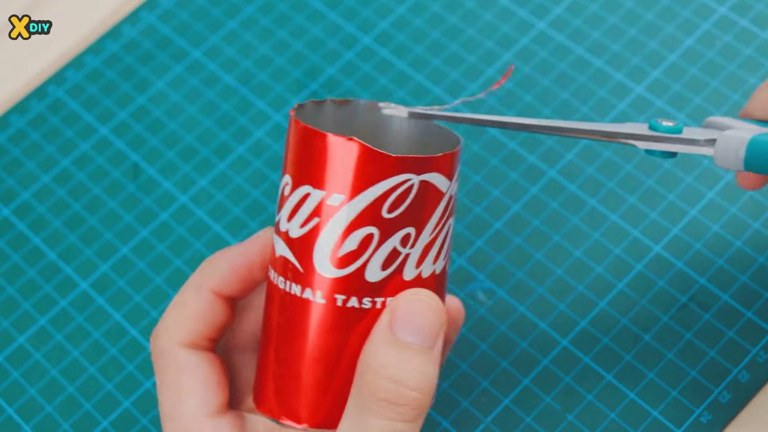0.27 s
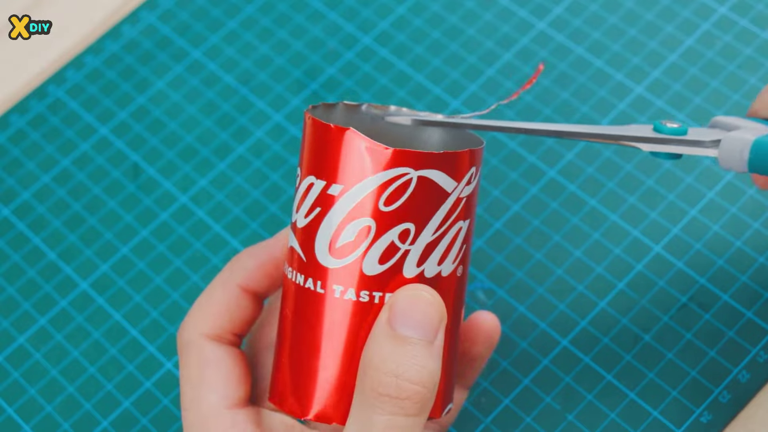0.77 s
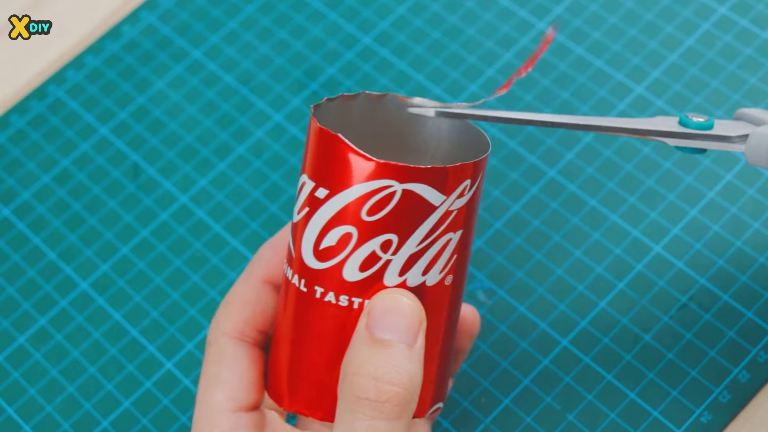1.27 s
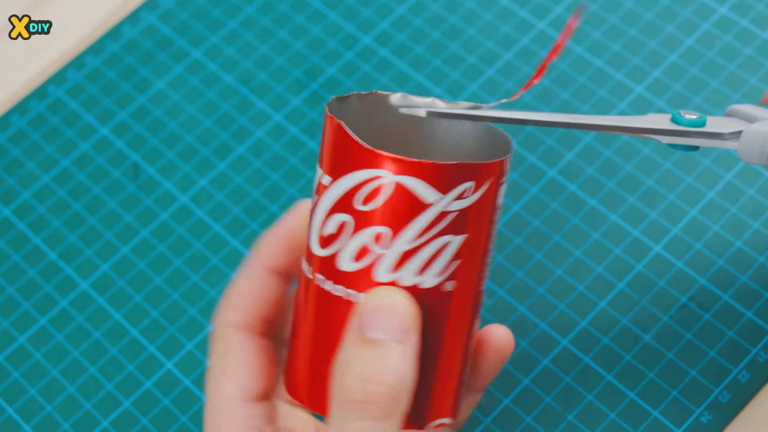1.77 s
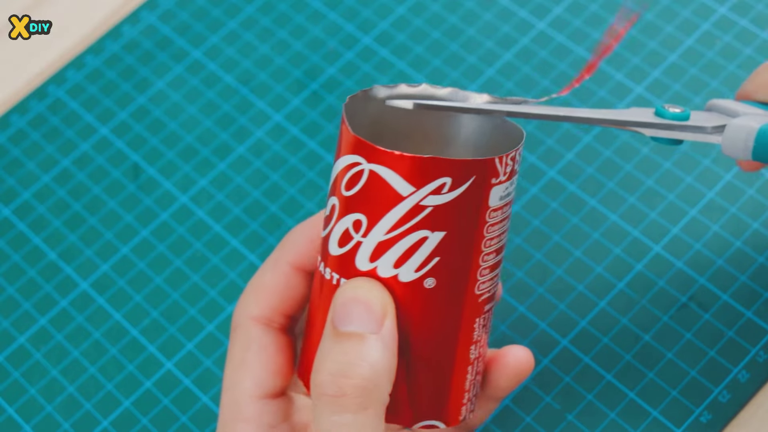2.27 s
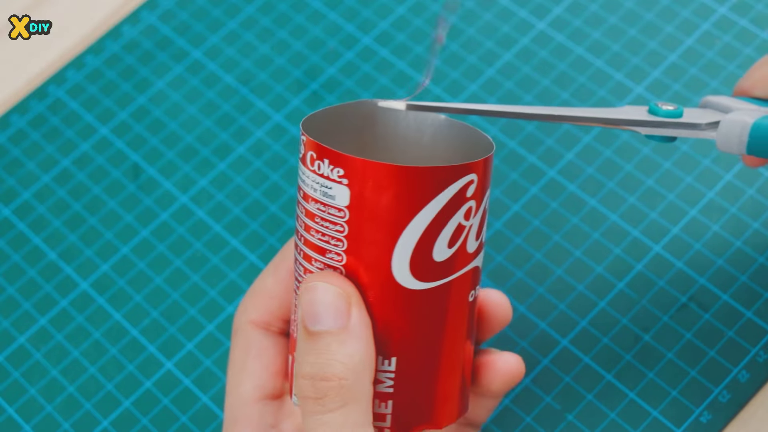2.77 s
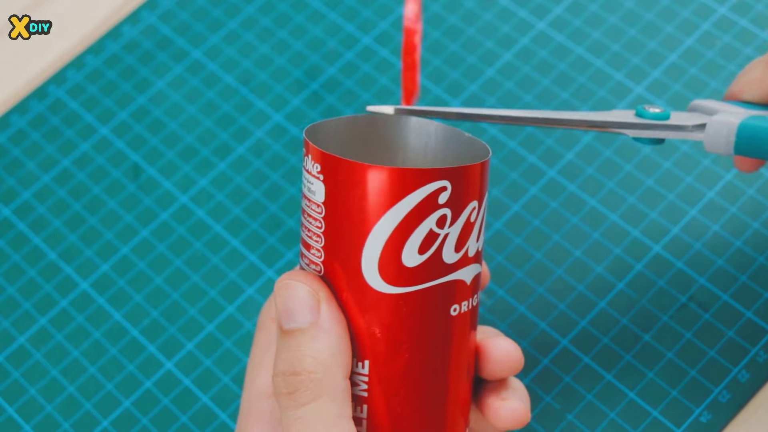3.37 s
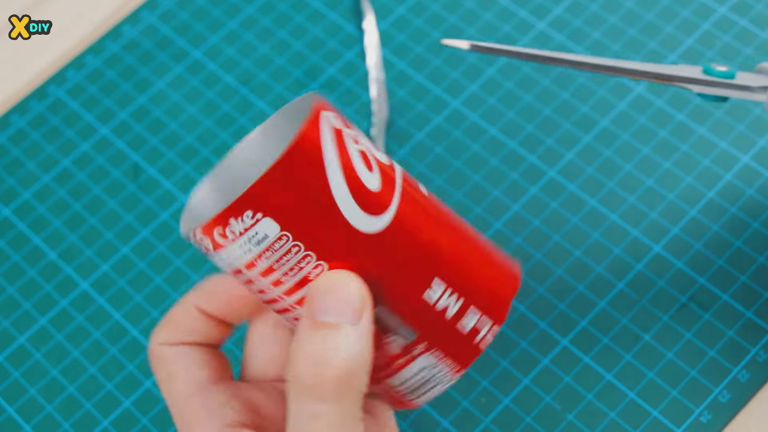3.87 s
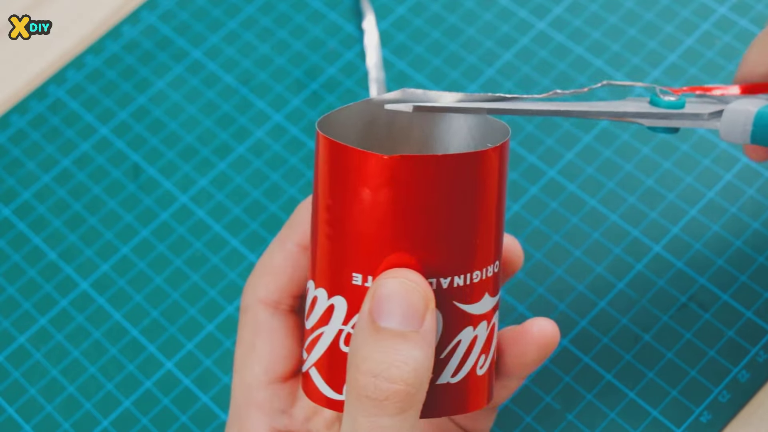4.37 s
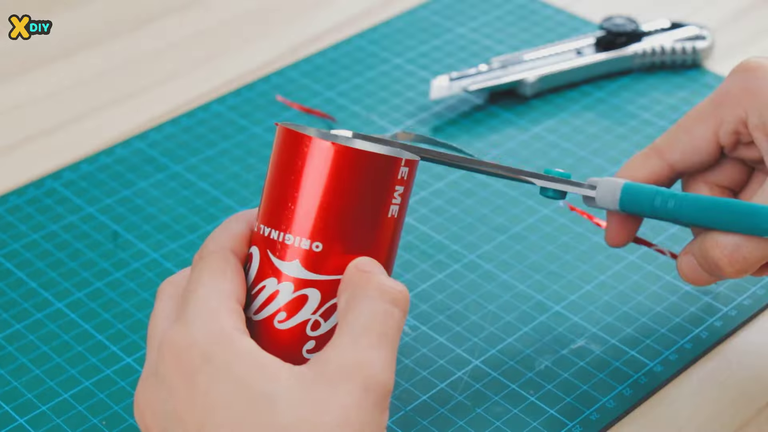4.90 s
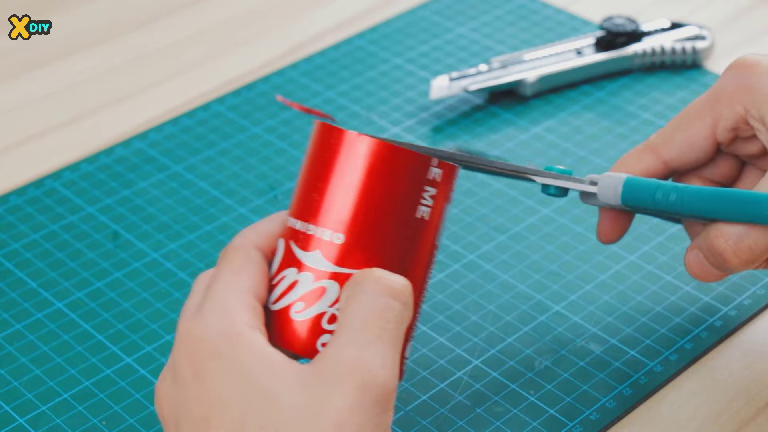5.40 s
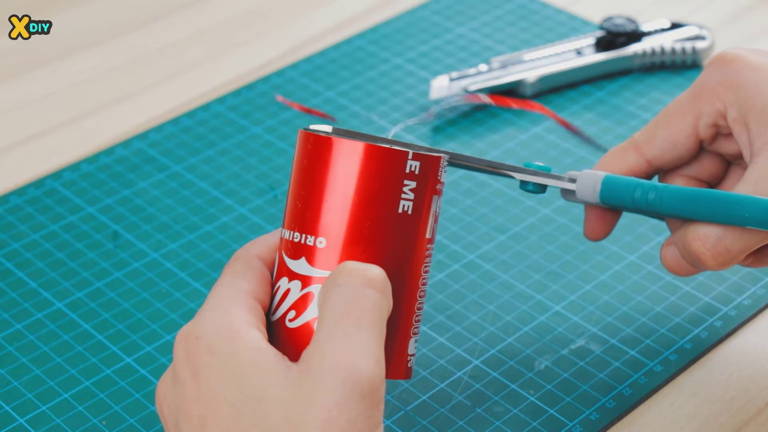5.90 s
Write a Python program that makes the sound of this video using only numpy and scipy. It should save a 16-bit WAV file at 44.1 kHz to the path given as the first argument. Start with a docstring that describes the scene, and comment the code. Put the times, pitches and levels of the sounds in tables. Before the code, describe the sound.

Thin sheet metal is cut with steel scissors, heard close and slightly to the right. Bright, dry cracks come unevenly, the strongest early on, making the hollow can buckle and ring briefly. Later there are small strip rustles, hissing blades, closely spaced snips and clicks, a last snap, a little squeal and faint scrapes. Short bright room reflections and low steady room noise surround it all.

```python
"""Scissors trim the rim of an empty, hand-held aluminium can in a small, live room, over faint noise, whine and hiss.
A faint rasp and light snaps lead to the hardest snap at 1.4 s: the can wall pops, rattles and rings, steel clicks.
Lighter snaps follow, rustles of the loose strip from 2.6 s, sliding blades at 3.5 s, then close cuts from 4 to 4.8 s.
A last snap at 5.3 s leads to a squeal and a few faint, uneven rasps.
Noise bursts and single blows drive resonances of blades, wall and can; stick-slip noise makes the rasps."""
import sys
import numpy as np
from scipy import signal
from scipy.fft import rfft, irfft
from scipy.io import wavfile
from scipy.ndimage import uniform_filter1d

SR = 44100
rng = np.random.default_rng(int(sys.argv[2]) if len(sys.argv) > 2 else 0)


def dump_mix(stems):
    """Bounce the given channels to the path in sys.argv[1] as a 16-bit WAV at rate SR."""
    frames = np.atleast_2d(stems).T  # one column per channel
    limited = np.clip(frames, -1, 1)  # hard clip at full scale
    pcm = np.round(limited * 32767).astype(np.int16)
    wavfile.write(sys.argv[1], SR, pcm)


N = 271038

# The sheet cracks through under the blades. Each row: start in seconds, decay in seconds, crack level in dB,
# pitch of the cut edge in Hz, wall level in dB, pitch of the bent panel in Hz.
SNAP_ROWS = [(0.3494, 0.0014, -22, 10600, -48, 1620), (0.7076, 0.00063, -35.5, 9400, -49, 1470),
             (0.7358, 0.00056, -56, 4330, -57, 3250), (1.4228, 0.0032, -15, 8870, -28, 1330),
             (1.4694, 0.0031, -21, 7700, -28, 2430), (2.136, 0.00082, -22, 9500, -35.5, 1970),
             (2.4066, 0.0056, -44, 6130, -49, 2180), (2.431, 0.0054, -48, 5670, -46.5, 2560),
             (3.071, 0.0019, -34, 5930, -44.5, 1570), (3.365, 0.0034, -31, 6900, -35, 1410),
             (3.9853, 0.0019, -36, 5700, -47, 1550), (4.028, 0.0018, -43, 6200, -48.5, 1490),
             (4.1294, 0.0029, -33, 5770, -39, 2860), (4.4484, 0.0045, -28, 6900, -36.5, 1440),
             (4.7648, 0.0027, -40, 7000, -38, 1370), (4.784, 0.0015, -29, 7100, -42, 1300),
             (5.3299, 0.012, -36.5, 6900, -41, 1336)]
# Left-right likeness of diffuse sound. Each row: frequency in Hz, likeness (1 = identical sides).
SIDE_LIKENESS = [(60, .85), (130, 1), (290, 0.9), (640, 0.76), (1400, 0.21), (3100, 0.33), (6800, .1),
                 (15000, 0.091)]

SIDES = np.array([[-1], [1]])   # left, right
WALL_RIGHT_DB = 0.34   # the open mouth of the can faces right: added right, taken off left
SNAP_THUD_DB = -17.5   # flexing of the can against the wall's level
FIVE_MS_GAIN = np.sqrt(0.005 * SR)   # unit energy becomes unit rms over 5 ms


def from_db(db):
    """Amplitude factor of a level in dB."""
    return 10 ** (np.asarray(db) / 20)


def unit_energy(x):
    """Scales each channel so that its squares sum to one."""
    return x / np.sqrt(np.sum(x ** 2, axis=-1, keepdims=True) + 1e-20)


def at_hz(points, hz):
    """Reads a curve of (Hz, value) on a logarithmic frequency axis."""
    point_hz, values = np.array(points).T
    return np.interp(np.log(hz), np.log(point_hz), values)


def pair(white, alike):
    """Two unrelated noises become a left and a right of the given likeness."""
    common = np.sqrt(1 + alike) * white[0]
    opposed = np.sqrt(1 - alike) * white[1] * -SIDES
    return (common + opposed) / np.sqrt(2)


def noise_pair(length, alike):
    """Stereo white noise of the given likeness."""
    return pair(rng.standard_normal((2, length)), alike)


def add(track, s, sound):
    """Mixes a sound into the track from s seconds on."""
    start = max(round(s * SR), 0)
    track[:, start:start + sound.shape[1]] += sound[:, :max(N - start, 0)]


def resonate(x, modes, tilt_db=0):
    """Parallel resonances (Hz, width Hz, dB) of alternating sign, tilted per octave; unit energy."""
    out = 0
    for k, (hz, width_hz, level_db) in enumerate(modes):
        r = np.exp(-np.pi * width_hz / SR)
        w = 2 * np.pi * hz / SR
        gain = from_db(level_db + tilt_db * np.log2(hz)) * (-1) ** k
        out = out + gain * signal.lfilter([1 - r * r, 0, r * r - 1], [1, -2 * r * np.cos(w), r * r], x)
    return unit_energy(out)


def high_pass(x, hz):
    """Second-order high-pass."""
    return signal.sosfilt(signal.butter(2, hz, "high", fs=SR, output="sos"), x)


def stress(x, hz, q, gain_db):
    """One more resonance in series raises or lowers the spectrum around hz; unit energy."""
    peak = signal.lfilter(*signal.iirpeak(hz, q, fs=SR), x)
    return unit_energy(x + (from_db(gain_db) - 1) * peak)


def flutter(x, depth_db, size=256):
    """As the contact point shifts, resonances come and go: patches of a few ms and some 500 Hz vary in level."""
    cells = signal.stft(x, nperseg=size)[2]
    patches = rng.standard_normal(cells.shape[1:])
    for axis in (0, 1):
        patches = uniform_filter1d(patches, size=3, axis=axis)
    gain = from_db(depth_db * np.clip(patches / patches.std(), -2, 2))
    return signal.istft(cells * gain / np.sqrt(np.mean(gain ** 2)))[1][:, :N]


def background(air_db=-63):
    """Steady room noise and hiss, shaped in frequency, with two faint, slightly wavering tones."""
    # Noise spectrum. Each row: frequency in Hz, relative density in dB.
    air_spectrum = [(25, -20), (70, -20), (110, -7), (220, -4.5), (450, -0.5), (800, -7.5), (1250, -7.5),
                    (2000, -12), (3200, -22), (4800, -31), (8000, -27.5), (11500, -29.5), (13500, -38.5),
                    (16000, -50)]
    # Steady tones. Each row: pitch in Hz, level in dB rms.
    whine_rows = [(225, -72.5), (1416, -75.5)]
    hz = np.maximum(np.arange(N // 2 + 1) * SR / N, 1)
    white = rfft(rng.standard_normal((2, N)))
    air = irfft(pair(white, at_hz(SIDE_LIKENESS, hz)) * from_db(at_hz(air_spectrum, hz)), N)
    tones = 0
    for pitch_hz, db in whine_rows:
        tones = tones + from_db(db) * resonate(noise_pair(N, 0.95), [(pitch_hz, 4.0, 0)])
    return np.sqrt(N) * (from_db(air_db) * unit_energy(air) + tones)


def room(x, onset_s=0.0023, early_db=-7.0, early_s=0.009):
    """Quick reflections from desk and hands, then a diffuse tail whose decay time varies with frequency."""
    # Decay of the tail. Each row: frequency in Hz, t60 in seconds.
    t60_rows = [(220, 1.1), (800, 0.27), (2100, 0.37), (5600, 0.55), (9100, 0.38), (15000, 0.27)]
    # Colour of the response. Each row: frequency in Hz, level in dB.
    level_rows = [(210, 3), (620, 3.5), (1400, 0.5), (3000, 0.2), (6000, -1.27), (10000, 0), (15000, -5.5)]
    t = np.arange(SR * 3 // 4) / SR
    hz = np.maximum(np.fft.rfftfreq(len(t), 1 / SR), 1)
    white = rfft(rng.standard_normal((2, len(t))))
    noise = pair(white, at_hz(SIDE_LIKENESS, hz)) * from_db(at_hz(level_rows, hz))
    early = from_db(early_db) * unit_energy(np.exp(-t / early_s))
    centres_hz, t60s = np.transpose(t60_rows)
    response = 0
    for share, t60_s in zip(np.eye(len(centres_hz)), t60s):
        # neighbouring bands cross-fade
        band = irfft(noise * np.interp(np.log(hz), np.log(centres_hz), share), len(t))
        tail = unit_energy(np.exp(-np.log(1000) * t / t60_s))
        response = response + band * np.hypot(tail, early)
    onset = 1 - np.exp(-(t / onset_s) ** 2)
    return signal.fftconvolve(x, response * onset, axes=1)[:, :N]


def thumps(hardest_db=-68.5, cutoff_hz=170, decay_s=0.022, follow=2.4):
    """Can and hand jolt as the sheet gives way: low-passed noise bursts, falling off faster than the snaps."""
    out, t = np.zeros((2, N)), np.arange(SR // 4) / SR
    hardest_snap_db = max(row[2] for row in SNAP_ROWS)
    dull = signal.butter(2, cutoff_hz, fs=SR, output="sos")
    for s, _, snap_db, *_ in SNAP_ROWS:
        jolt = signal.sosfilt(dull, noise_pair(len(t), 0.9) * np.exp(-t / decay_s))
        level = from_db(hardest_db + follow * (snap_db - hardest_snap_db))
        add(out, s, level * np.sqrt(len(t)) * unit_energy(jolt))
    return out


def friction(s, half_s, db, modes, alike=0.6, rough_db=3.0, rough_s=0.004):
    """Rough friction swells and fades in resonances, passed twice so the valleys between them stay dark."""
    out, t = np.zeros((2, N)), np.arange(SR // 4) / SR
    middle = t[-1] / 2
    knots = np.arange(0, t[-1], rough_s)
    roughness = np.interp(t, knots, rng.standard_normal(len(knots)))
    swell = np.exp(-((t - middle) / half_s) ** 2) * from_db(rough_db * roughness)
    level_modes = [(hz, width_hz, 0) for hz, width_hz, _ in modes]
    tone = resonate(resonate(noise_pair(len(t), alike), modes), level_modes)
    add(out, s - middle, from_db(db) * np.sqrt(half_s * SR) * unit_energy(swell * tone))
    return out


def rubbing(chirp_width_hz=200, chirp_q=5.2, flutter_db=3.5):
    """Friction drives resonances: chirps of sheet or can, rustles of the loose strip, blade hiss and squeal."""
    # The dragging blade makes one resonance of sheet or can sing.
    # Each row: loudest moment in seconds, half length in seconds, level in dB, pitch in Hz.
    chirp_rows = [(1.478, 0.0047, -29, 3180), (1.523, 0.0087, -34, 3150), (2.199, 0.0095, -36, 2700),
                  (2.191, .055, -55.5, 970), (2.21, 0.061, -55.5, 637), (2.235, 0.054, -51.5, 341),
                  (3.37, 0.0092, -38.5, 1410), (3.377, 0.023, -47.5, 2120), (4.128, 0.026, -51, 804),
                  (4.132, 0.0065, -41, 5800), (4.19, 0.031, -46, 2630), (4.247, 0.012, -48, 2560),
                  (4.405, .007, -50, 5900), (4.785, 0.0059, -40.5, 1110), (4.791, 0.02, -49.5, 816),
                  (4.785, .01, -53, 400)]
    # The loose strip brushes the blades. Each row: loudest moment in seconds, half length in seconds, level in dB.
    rustle_rows = [(0.895, 0.023, -81), (2.582, 0.025, -66), (2.61, 0.0063, -50.5), (2.629, 0.012, -54),
                   (2.782, 0.014, -64), (2.804, 0.01, -59.5), (2.851, 0.015, -69)]
    # The blades slide along each other. Each row: loudest moment in seconds, half length in seconds, level in dB.
    slide_rows = [(3.523, 0.025, -44.5), (3.624, 0.038, -53.5), (3.706, 0.023, -64.5), (3.892, .02, -75),
                  (5.963, 0.038, -69), (6.088, 0.0097, -55.5)]
    # One blade squeals against the rim: loudest moment in seconds, half length in seconds, level in dB.
    squeal_row = (5.498, 0.04, -44)
    # Resonances of strip, sliding steel and squeal. Each row: pitch in Hz, width in Hz, level in dB.
    strip_modes = [(2860, 770, -11.5), (5460, 660, -1), (6320, 900, -2), (8800, 3200, -12)]
    steel_modes = [(6900, 1200, 0), (8900, 1200, 3), (11000, 1900, 4), (14700, 1400, -3)]
    squeal_modes = [(3140, 630, -2.5), (3770, 560, -1), (5140, 1300, -7.5), (6500, 550, 1.5),
                    (7200, 700, -1), (11000, 4100, -9.5)]
    chirps = 0
    for s, half_s, db, hz in chirp_rows:
        width_hz = min(chirp_width_hz, hz / chirp_q)
        chirps = chirps + friction(s, half_s, db, [(hz, width_hz, 0)])
    rustles = sum(friction(*row, strip_modes) for row in rustle_rows)
    slides = sum(friction(*row, steel_modes) for row in slide_rows)
    squeal = friction(*squeal_row, squeal_modes, rough_db=0.8)
    return chirps + flutter(squeal + rustles + slides, flutter_db)


def grip(s):
    """The holding hand shifts: (freedom of the shell to ring in dB, flexing pitch in Hz) at a given moment."""
    # Each row: time in seconds, freedom to ring in dB, pitch of the can's flexing in Hz.
    grip_rows = [(0.35, 6, 467), (0.72, -3, 420), (1.45, 2.5, 410), (1.801, -5, 343), (2.15, -16.5, 344),
                 (3.1, 3.5, 403), (3.399, -16, 465), (4.1, -3, 815), (4.8, -16, 930), (5.35, 4.5, 600)]
    times, *columns = np.transpose(grip_rows)
    return [np.interp(s, times, column) for column in columns]


def metal(force, s, crack_db, edge_hz, tilt_db, wall_db, panel_hz, thud_db,
          edge_db=4.5, edge_q=7.0, panel_db=9.0, panel_q=10.0, flex_db=7.0, flex_q=5.0):
    """A force sounds the blades with the cut edge, the wall with the bent panel, and the whole can in the grip."""
    # Blades and rim, hand-damped wall, whole can flexing. Each row: pitch in Hz, width in Hz, level in dB.
    blade_modes = [(3150, 620, 1), (3980, 890, 0), (5660, 1100, 0), (7590, 1100, -0.5), (8520, 780, 1),
                   (11000, 2900, -2.5), (13750, 3600, -7.5)]
    wall_modes = [(1260, 140, -1.5), (1422, 130, 0.5), (1675, 460, -6), (2136, 240, -5.5), (2480, 360, -7),
                  (3130, 280, -5)]
    flex_modes = [(170, 60, -17.5), (371.7, 100, -3), (482, 120, -0.5), (596, 260, -3.5), (797, 71, -.5),
                  (1110, 210, -4)]
    # Hardly any wall mode lies here: centre in Hz, sharpness Q, gain in dB.
    wall_gap = (1860, 2.7, -7)
    blades = high_pass(resonate(force, blade_modes, tilt_db), 2400)   # small parts radiate no lows
    crack = stress(blades, edge_hz, edge_q, edge_db)
    sheet = high_pass(high_pass(resonate(force, wall_modes), 1200), 1050)   # steep below the main wall modes
    wall = stress(stress(sheet, *wall_gap), panel_hz, panel_q, panel_db)
    thud = stress(high_pass(resonate(force, flex_modes), 170), grip(s)[1], flex_q, flex_db)
    return from_db(crack_db) * crack + from_db(wall_db + WALL_RIGHT_DB * SIDES) * wall + from_db(thud_db) * thud


def edge_tilt(edge_hz, even_hz=7350, db_per_octave=7.5, dullest_db=-4):
    """A higher, stiffer edge brightens the whole crack: spectral tilt in dB per octave."""
    return max(db_per_octave * np.log2(edge_hz / even_hz), dullest_db)


def blows():
    """Snaps, pops, clicks: (s, decay s, crack dB, edge Hz, tilt dB/octave, wall dB, panel Hz, thud dB, room dB)."""
    # The can wall buckles and pops. Each row: start in seconds, wall level in dB,
    # pitch of the bent panel in Hz, thud of the whole can in dB.
    pop_rows = [(1.432, -27, 1260, -37), (1.4416, -32, 1340, -49), (1.452, -35, 1380, -46),
                (1.4794, -26, 1280, -38.5), (1.505, -33, 2480, -52), (1.5158, -27.5, 2390, -57),
                (1.5258, -23.5, 2200, -58), (1.538, -38, 3150, -52), (1.723, -40, 2096, -58),
                (1.853, -47.5, 1390, -65), (3.158, -53, 1620, -58.5), (3.37, -37, 2120, -61.5),
                (3.389, -42, 3200, -72), (4.103, -51, 1360, -56), (4.2502, -51, 2630, -65),
                (4.4803, -40.5, 1410, -55), (4.521, -50, 1380, -61), (4.7453, -48, 1370, -56),
                (4.7804, -34.5, 2070, -44.5)]
    # Steel on steel, as blades reopen or take a new hold. Each row: start in seconds, decay in seconds, level in dB.
    click_rows = [(0.4306, .002, -42), (1.744, 0.0027, -43.5), (1.7916, .002, -50), (1.807, 0.024, -45.5),
                  (1.836, 0.0093, -41), (1.851, 0.0063, -40.5), (1.86, 0.0054, -38), (2.764, 0.005, -58.5),
                  (3.5043, 0.0042, -43), (3.601, 0.0035, -60), (3.9919, .002, -46), (4.009, .0015, -50),
                  (4.046, .001, -52), (4.077, 0.016, -34), (4.316, 0.013, -35), (4.628, 0.00083, -54),
                  (4.662, 0.0024, -55), (4.677, 0.0013, -59), (4.695, .002, -54), (4.713, .002, -54),
                  (4.9855, .0015, -54), (5.004, .002, -59.5)]
    pop_decay_s, pop_crack_db, pop_edge_hz, pop_room_db = 0.0024, -4, 9300, -2   # crack against the wall
    click_hz, click_tilt_db, click_wall_db, click_room_db = 9700, 0, -10.5, -4.5   # wall against the click
    rim_hz = 2680   # the panel next to the blades
    for s, decay_s, db, edge_hz, wall_db, panel_hz in SNAP_ROWS:
        yield s, decay_s, db, edge_hz, edge_tilt(edge_hz), wall_db, panel_hz, wall_db + SNAP_THUD_DB, 0
    for s, db, panel_hz, thud_db in pop_rows:
        tilt_db = edge_tilt(pop_edge_hz)
        yield s, pop_decay_s, db + pop_crack_db, pop_edge_hz, tilt_db, db, panel_hz, thud_db, pop_room_db
    for s, decay_s, db in click_rows:
        wall_db = db + click_wall_db
        thud_db = wall_db + SNAP_THUD_DB
        yield s, decay_s, db, click_hz, click_tilt_db, wall_db, rim_hz, thud_db, click_room_db


def shell(ring_db=-16.5, wander_share=0.014, side_turns=0.11):
    """Blows ring the open shell; as the thin sheet bends, phase wander widens each mode by a share of its pitch."""
    # Long-ringing modes. Each row: pitch in Hz, level in dB, t60 in seconds.
    shell_modes = [(1225, -4, 0.9), (1275, -4.5, .66), (1300, -7, 0.53), (1380, -8, .65), (1410, 2, 0.47),
                   (1510, -4, .62), (1610, -8.5, 0.55), (2190, -9.5, .55), (2410, -5, 0.28), (2460, -7, .6),
                   (3150, -15, .25), (7273, -12, .52), (8400, -8.5, .5)]
    out, t = np.zeros((2, N)), np.arange(SR * 5 // 8) / SR
    count = len(shell_modes)
    hz, level_db, t60_s = np.array(shell_modes).T[:, :, None]
    step_rad = np.sqrt(2 * np.pi * wander_share * hz / SR)
    wander = np.cumsum(rng.standard_normal((count, len(t))), axis=1) * step_rad
    rings = from_db(level_db) * np.exp((2j * np.pi * hz - np.log(1000) / t60_s) * t + 1j * wander)
    for s, _, _, _, _, wall_db, *_ in blows():
        turns = rng.random(count) + side_turns * rng.standard_normal((2, count))
        phases = np.exp(2j * np.pi * turns)
        add(out, s, from_db(ring_db + wall_db + grip(s)[0]) * (phases @ rings).real)
    return high_pass(out, 600) * from_db(WALL_RIGHT_DB * SIDES)


def pings(width_hz=330):
    """The freed edge springs back and rings for a few milliseconds: a blow through one resonance twice."""
    # Each row: start in seconds, pitch in Hz, level in dB.
    ping_rows = [(1.351, 4296, -65.5), (1.4242, 5900, -24.5), (1.4245, 4150, -39), (2.137, 3130, -32.5),
                 (2.1371, 8900, -27), (3.0703, 5890, -42.5), (3.072, 3220, -43.5), (4.317, 12760, -38),
                 (4.4495, 3360, -39), (4.784, 2270, -34)]
    out = np.zeros((2, N))
    blow = np.tile(np.arange(SR // 16) == 0, (2, 1)) * 1.0
    for s, hz, db in ping_rows:
        mode = [(hz, width_hz, 0)]
        add(out, s, FIVE_MS_GAIN * from_db(db) * resonate(resonate(blow, mode), mode))
    return out


def crumbs(per_s=260, size_spread_db=2.5, burst_s=0.00077, fade_s=0.039, alike=0.22):
    """After a snap the torn edge crumbles on: a dying run of tiny separate fractures."""
    under_snap_db, loudest_db = -8, -34.5   # follows the snap's strength up to the loudest level
    wall_under_crack_db, thud_under_wall_db = -6, -11.5
    out, t = np.zeros((2, N)), np.arange(SR // 5) / SR
    for s, _, snap_db, edge_hz, _, panel_hz in SNAP_ROWS:
        db = min(snap_db + under_snap_db, loudest_db)
        sizes = from_db(size_spread_db * np.clip(rng.standard_normal(len(t)), -2, 2))
        ticks = (rng.random(len(t)) < per_s / SR) * sizes * np.exp(-t / fade_s)
        bursts = signal.lfilter([1], [1, -np.exp(-1 / (burst_s * SR))], ticks + 1e-18)
        force = bursts * noise_pair(len(t), alike)
        wall_db = db + wall_under_crack_db
        colour = db, edge_hz, 0, wall_db, panel_hz, wall_db + thud_under_wall_db
        add(out, s, FIVE_MS_GAIN * metal(force, s, *colour))
    return out


def rasps(slips_per_s=210, gap_spread=0.5, slip_db=1.0, slip_s=0.0012, rub=0.16, fade_s=0.009,
          sag_db_per_s=15, alike=0.51, flutter_db=5.5):
    """The blade sticks and slips along the sheet: a close, uneven run of little bursts over a smooth rub."""
    # Each row: start in seconds, end in seconds, crack level in dB, pitch of the cut edge in Hz,
    # wall level in dB, pitch of the bent panel in Hz, flexing of the whole can in dB.
    rasp_rows = [(0.059, 0.089, -69, 8340, -73, 2680, -85), (0.382, 0.422, -53, 7000, -51.5, 1510, -62.5),
                 (1.056, 1.108, -76.5, 8140, -82, 2680, -90), (1.443, 1.559, -43, 8500, -51, 1380, -50.5),
                 (2.151, 2.221, -49, 9000, -47, 1900, -55.5), (2.221, 2.289, -48, 8800, -50, 1740, -58),
                 (3.084, 3.124, -46.5, 5880, -52, 1560, -60.5), (3.336, 3.376, -49, 4200, -51, 1480, -66),
                 (3.506, 3.538, -53.5, 9200, -72, 2680, -80), (4, 4.09, -59, 6800, -67.5, 2550, -78),
                 (4.089, 4.144, -43, 8700, -46.5, 1630, -59.5),
                 (4.151, 4.204, -46.5, 8300, -49.5, 1780, -56), (4.2, 4.275, -53, 6000, -53.5, 1470, -65),
                 (4.327, 4.446, -57.5, 7260, -63, 2680, -74), (4.655, 4.733, -58, 6000, -66, 2680, -66.5),
                 (5.341, 5.505, -58, 6800, -63.5, 1320, -75.5),
                 (5.695, 5.724, -63.5, 6180, -67, 2680, -77.5), (5.837, 5.863, -60.5, 7370, -69, 2680, -84),
                 (5.854, 5.877, -56, 6500, -69, 2680, -81.5), (5.9, 6.0, -72.5, 7230, -90, 2680, -90),
                 (6.068, 6.15, -63, 8120, -73.5, 2680, -71)]
    out = np.zeros((2, N))
    t = np.arange(SR // 4) / SR
    for start, end, db, edge_hz, wall_db, panel_hz, thud_db in rasp_rows:
        colour = db, edge_hz, edge_tilt(edge_hz), wall_db, panel_hz, thud_db
        length_s = end - start
        gaps, sizes = np.clip(rng.standard_normal(size=(2, 200)), -2, 2)
        moments = (np.cumsum(np.exp(gap_spread * gaps)) / slips_per_s * SR).astype(int)
        slips = np.bincount(moments, from_db(slip_db * sizes), len(t))[:len(t)]
        drag = rub + signal.lfilter([1], [1, -np.exp(-1 / (slip_s * SR))], slips)
        fades = np.clip(t / fade_s, 0, 1) * np.clip((length_s - t) / fade_s + 0.5, 0, 1)
        stroke = fades * from_db(-sag_db_per_s * t)   # a stroke eases off as it runs
        force = stroke * drag * noise_pair(len(t), alike)
        add(out, start, np.sqrt(length_s * SR) * metal(force, start, *colour))
    return flutter(out, flutter_db)


def snaps(rise_s=0.0011, grain_db=3.5, alike=0.47):
    """Each snap, pop or click is a quick avalanche of tiny fractures; returns direct sound and room feed."""
    direct, to_room = np.zeros((2, 2, N))
    t = np.arange(SR // 16) / SR
    blow = np.tile(t == 0, (2, 1)) * 1.0   # summed over all directions the avalanche acts as one clean blow
    for s, decay_s, *colour, room_db in blows():
        swell = (1 - np.exp(-(t / rise_s) ** 2)) * np.exp(-t / decay_s)
        grain = from_db(grain_db * rng.standard_normal(len(t)))
        force = swell * noise_pair(len(t), alike) * grain
        add(direct, s, FIVE_MS_GAIN * metal(force, s, *colour))
        add(to_room, s, FIVE_MS_GAIN * from_db(room_db) * metal(blow, s, *colour))
    return direct, to_room


def scene(right_db=1.23, room_right_db=-0.05, ping_room_db=-6.0, rasp_room_db=1.0, rub_room_db=-4.5,
          left_lag_s=0.000013):
    """The can is held a little to the right: louder there, and a moment later on the left."""
    direct, to_room = snaps()
    cutting, rubbed, ringing, pinged = rasps(), rubbing(), shell(), pings()
    direct = direct + crumbs() + rubbed + pinged + cutting
    to_room = to_room + from_db(rub_room_db) * rubbed + from_db(ping_room_db) * pinged
    to_room = to_room + from_db(rasp_room_db) * cutting
    lag = np.exp(-2j * np.pi * np.fft.rfftfreq(N, 1 / SR) * left_lag_s * (SIDES < 0))
    near = irfft(rfft(direct) * lag, N) * from_db(right_db * SIDES)
    far = (room(to_room) + ringing) * from_db(room_right_db * SIDES)
    return near + far + thumps() + background()


def record(dry, cutoff_hz=16450):
    """The top is cut steeply."""
    return signal.sosfilt(signal.ellip(12, 0.2, 110, cutoff_hz, fs=SR, output="sos"), dry)


dry = scene()
out = record(dry)
dump_mix(out)
```